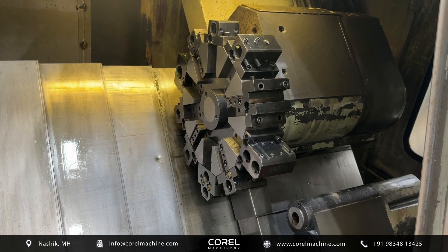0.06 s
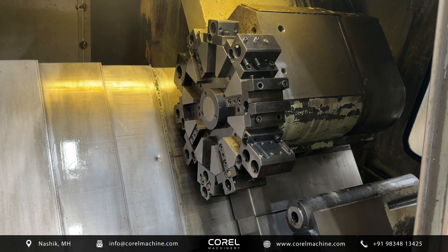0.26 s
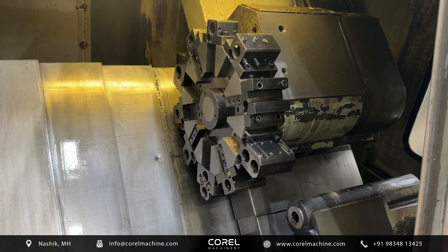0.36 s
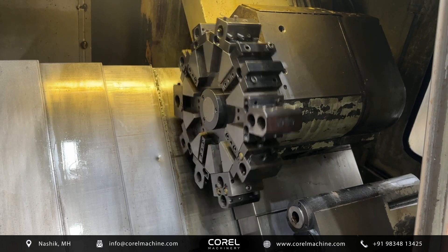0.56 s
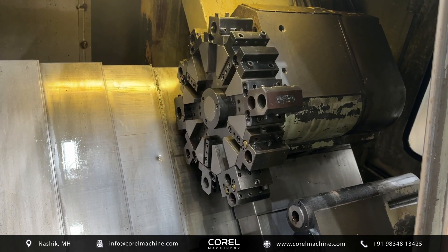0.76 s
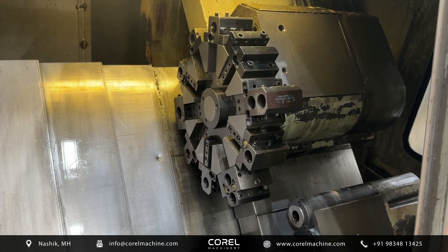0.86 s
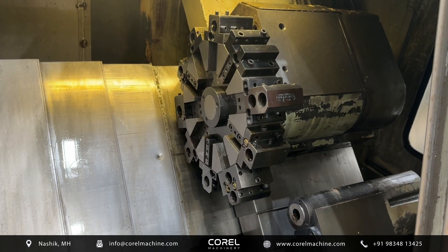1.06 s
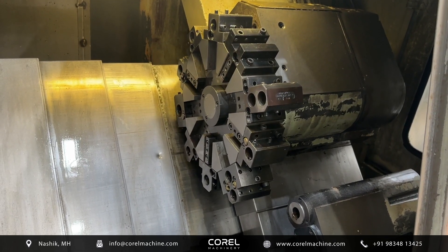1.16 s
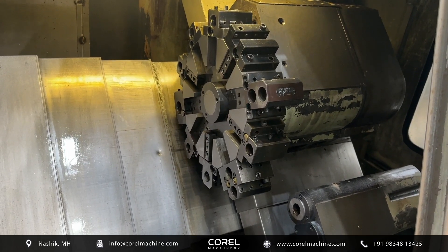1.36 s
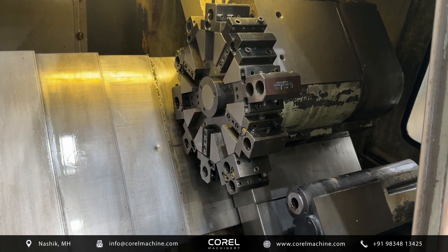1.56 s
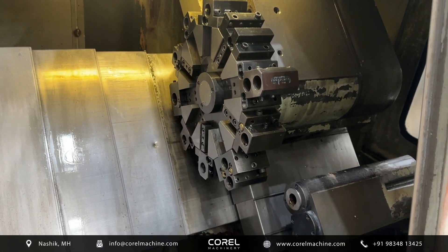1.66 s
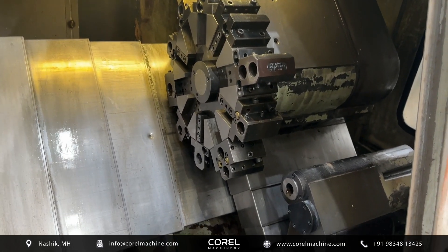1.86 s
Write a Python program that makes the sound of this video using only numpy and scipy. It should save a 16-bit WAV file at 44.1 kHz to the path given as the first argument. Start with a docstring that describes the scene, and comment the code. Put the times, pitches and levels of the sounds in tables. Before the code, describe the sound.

A lathe turret indexes once inside a metal cabinet, over steady fans, pump hum and a thin high whine. At about 0.3 seconds it unlocks with a hiss and a clunk, then turns with a low rumble, gear knocks and more short hisses. Near 0.8 seconds it locks with a heavy, panel-rattling clunk. A faint oil line whistle fades by 1.2 seconds, leaving the running machine hum.

```python
"""Lathe turret indexing

Inside a sheet-metal cabinet the tool turret unlocks, swings round with a low rumble and soft gear
knocks, brakes and locks with a heavy clunk. Each blow rings turret and cabinet; the hard ones rattle
the panels. Valves and slides hiss with the moves and the oil line sings faintly. Under it all runs
a bed of cooling fans, a humming pump, motor tones and the thin whine of a drive."""
import sys
import numpy as np
from scipy import signal
from scipy.fft import rfft, irfft
from scipy.io import wavfile
from scipy.ndimage import uniform_filter1d

SR = 44100
rng = np.random.default_rng(int(sys.argv[2]) if len(sys.argv) > 2 else 0)


def pcm_store(signal):
    """Save signal as 16-bit PCM."""
    levels = np.round(np.clip(np.atleast_2d(signal), -1, 1) * 32767)
    wavfile.write(sys.argv[1], SR, levels.astype(np.int16).T)


N = 83790
TIME = np.arange(N) / SR
FREQS = np.maximum(np.arange(N // 2 + 1) * SR / N, 1)
SIDES = np.array([[1], [-1]])  # left, right


def undb(db):
    """Decibels to gain."""
    return 10 ** (np.asarray(db) / 20)


def curve(points, axis=1):
    """One column of a table, drawn across the spectrum on a log-frequency axis."""
    table = np.array(points, float)
    return np.interp(np.log(FREQS), np.log(table[:, 0]), table[:, axis])


def pan(db):
    """Stereo gains that put the left side db above the right."""
    return undb(SIDES * db / 2)


def drift(rate_hz):
    """A smooth random modulator with a spread of 1."""
    step = int(SR / rate_hz)
    held = np.repeat(rng.standard_normal(128), step)[:N]
    smooth = uniform_filter1d(uniform_filter1d(held, step), step)
    return smooth / smooth.std()


# stereo image of the cabinet (frequency [Hz], left-right correlation, pan [dB])
CABINET_IMAGE = [(60, 1, 0), (130, 0.96, 0), (290, 0.89, 1.5), (640, 0.74, 0.5), (1310, 0.37, -2),
                 (2640, .1, -3), (4300, 0.31, -3.5), (6740, 0.13, 5), (10900, 0.097, -1.5),
                 (13700, 0.22, 0)]

def noise(spectrum, pan_db=None):
    """Coloured noise at unit level, with the cabinet's width and, by default, its pan."""
    mid, side = rfft(rng.standard_normal((2, N)))
    correlation = np.clip(curve(CABINET_IMAGE), -1, 1)
    if pan_db is None:
        pan_db = curve(CABINET_IMAGE, axis=2)
    stereo = mid * np.sqrt(1 + correlation) + SIDES * side * np.sqrt(1 - correlation)
    coloured = irfft(stereo * spectrum * pan(pan_db), N)
    return coloured / np.sqrt(np.mean(coloured ** 2))


def tone(hz, db, pan_db, flutter_db, shift_rad=None):
    """A fluttering sine; reflections shift its phase between the sides, more so in the treble."""
    if shift_rad is None:
        shift_rad = rng.uniform(-1.01, 1) * min(np.mean(hz) / 1500, 1) * 1.3
    phase = 2 * np.pi * (np.cumsum(hz) / SR + rng.random())
    flutter = undb(flutter_db * drift(15.87))
    flutter /= np.sqrt(np.mean(flutter ** 2))
    return np.sqrt(2) * undb(db) * pan(pan_db) * flutter * np.sin(phase + shift_rad * SIDES)


# colour of the fan air (frequency [Hz], relative level [dB])
FAN_EQ = [(24, -36), (40, 4), (70, 1.5), (100, -8.5), (145, 4), (185, -4.5), (320, 1.5), (520, 2),
          (720, -0.5), (950, -6), (1300, -4.5), (1650, -3.5), (2300, -8.5), (3200, -6), (5500, -11),
          (7800, -14.5), (10000, -19.5), (10800, -41)]

def fans(level_db=-36.5, flutter_db=0.2, eq_floor_db=-35, ripple_db=5, ripple_step_hz=28.33):
    """Rushing air, coloured by the many narrow resonances of the cabinet."""
    ripple = np.interp(FREQS / ripple_step_hz, np.arange(2048), rng.standard_normal(2048))
    depth_db = ripple_db * np.minimum(FREQS / 900, 1)  # smoother in the bass
    colour_db = np.maximum(curve(FAN_EQ), eq_floor_db) + depth_db * ripple
    return undb(level_db + flutter_db * drift(22)) * noise(undb(colour_db))


# partials of the pump hum (harmonic number, level [dB], pan [dB])
PUMP_PARTIALS = [(1, -44, 3.5), (2, -43, 3), (3, -55.5, 16), (4, -51.5, 0.5)]
PUMP_HZ = 219.3

def pump():
    """The pump hums, its partials wavering together with its speed."""
    pitch = PUMP_HZ * (1 + 0.0055 * drift(20))
    return sum(tone(round(k) * pitch, db, pan_db, flutter_db=2.5) for k, db, pan_db in PUMP_PARTIALS)


def churn(relative_db=-7, half_width_hz=19):
    """Oil churning in the pump roughens each partial with a narrow band of noise."""
    out = 0
    for k, db, pan_db in PUMP_PARTIALS:
        band = 1 / (1 + ((FREQS - round(k) * PUMP_HZ) / half_width_hz) ** 2)
        out += undb(db + relative_db) * noise(band, pan_db)
    return out


# tones of fans and motors (pitch [Hz], level [dB], pan [dB])
MOTOR_TONES = [(462, -53, 4), (1164, -50.5, 1), (1661, -57.5, 9), (1806, -56.5, -12), (1956, -61, -12.5),
               (2610, -56, -11), (2774, -56.5, -8), (3052, -58.5, -4), (3400, -61, -3), (6270, -74, 12)]

def motors(waver_hz=2.68):
    """Spinning fans and motors hold faint tones, each wavering on its own."""
    return sum(tone(hz + waver_hz * drift(20), db, pan_db, flutter_db=5)
               for hz, db, pan_db in MOTOR_TONES)


# the drive's lower side tone, centre tone and upper side tone (level [dB], pan [dB])
WHINE_TONES = [(-54.5, 4), (-48.5, 3.5), (-56, 0)]

def drive_whine(centre_hz=5984, beat_hz=61.5, waver_hz=0.95):
    """The drive's thin whine beats against a side tone below and above it."""
    pitch = centre_hz + waver_hz * drift(10)
    return sum(tone(pitch + (k - 1) * beat_hz, db, pan_db, flutter_db=1.24, shift_rad=0.67)
               for k, (db, pan_db) in enumerate(WHINE_TONES))


# fader ride of the rumble as the turret moves and settles (time [s], level [dB])
RUMBLE_FADER = [(.25, -45), (.30, -28.5), (.38, -34.5), (.46, -29.5), (.55, -32), (.60, -25.5),
                (.66, -37.5), (.72, -27), (.83, -28), (.90, -36), (1.04, -38.5), (1.3, -39.5)]
# colour of the rumble (frequency [Hz], relative level [dB])
RUMBLE_EQ = [(20, -38), (40, -7), (70, -2.5), (105, -2), (150, 0), (200, -6.5), (280, -9), (450, -8.5),
             (650, -18), (1000, -17.5), (2500, -27.5), (16000, -81)]

def rumble():
    """The gears rumble, swelling as the heavy disc turns."""
    cue_times, levels_db = np.array(RUMBLE_FADER).T
    return noise(undb(curve(RUMBLE_EQ))) * undb(np.interp(TIME, cue_times, levels_db))


def burst(start, rise_s, hold_s, t60):
    """Envelope with a linear attack, a hold and an exponential release."""
    age = TIME - start
    release = np.exp(-np.log(1000) * np.maximum(age - rise_s - hold_s, 0) / t60)
    return np.clip(age / rise_s, 0, 1) * release


# valve and slide cues (time [s], level [dB], centre [Hz], spread [octaves], t60 [s], pan [dB])
HISS_CUES = [(0.256, -33.5, 1860, 0.94, .17, -2), (.265, -34.5, 1700, 0.14, 0.12, -3),
             (.342, -40, 2910, 0.066, 0.14, 0), (0.429, -31.5, 3560, 0.69, 0.26, -4),
             (.432, -48, 7800, .45, 0.084, 15), (.518, -38.5, 4750, 0.2, 0.17, 0),
             (.508, -47, 8400, 0.7, 0.23, 0), (0.553, -40, 8800, 0.13, 0.087, 0),
             (0.553, -39.5, 4770, 0.54, 0.2, -2), (.598, -46, 15000, 0.14, 0.13, -1),
             (.700, -43.5, 5500, 0.49, 0.43, 1)]

def hisses():
    """Short puffs of band noise as valves switch and parts slide."""
    out = 0
    for start, db, hz, octaves, t60, pan_db in HISS_CUES:
        band = np.exp(-.5 * (np.log2(FREQS / hz) / octaves) ** 2)
        out += undb(db) * noise(band, pan_db) * burst(start, rise_s=0.0034, hold_s=0.011, t60=t60)
    return out


def soften(x, cutoff_hz):
    """A softer contact leaves out the treble."""
    return signal.sosfilt(signal.butter(2, min(cutoff_hz, SR / 3), fs=SR, output="sos"), x)


# body resonances of turret and cabinet (frequency [Hz], relative level [dB], t60 [s])
BODY_MODES = [(56, -20, 0.22), (107.4, -6, 0.27), (140.4, -1, 0.12), (205.5, -2.5, 0.17),
              (285.6, -8.5, .13), (351.7, -3.5, 0.074), (438.5, -1.5, 0.124), (524, -3.5, 0.12),
              (612.5, -2, 0.2), (728.6, -5.5, 0.28), (892, -6, 0.21), (1092.5, 2, 0.16), (1237, -9.5, 0.24)]

def ring(start, focus_hz, focus_db=6.5, focus_octaves=0.34, contact_s=0.006):
    """Turret and cabinet ring after a blow; where it lands lifts the modes around focus_hz."""
    age = np.maximum(TIME - start, 0)
    modes = 0
    for k, (hz, db, t60) in enumerate(BODY_MODES):
        lift_db = focus_db * np.exp(-.5 * (np.log2(hz / focus_hz) / focus_octaves) ** 2)
        decay = np.exp(-np.log(1000) * age / t60)
        modes += (-1) ** k * undb(db + lift_db) * decay * np.sin(2 * np.pi * hz * age)
    return modes * np.minimum(age / contact_s, 1)


# hard hits: unlock, start, brake, lock and its two rebounds
# (time [s], ring gain [dB], clatter gain [dB], low-pass [Hz], focus [Hz])
CLUNK_CUES = [(.288, -30, -28, 650, 442), (.4405, -28, -24.5, 860, 557), (.571, -29.5, -27, 640, 303),
              (.7745, -22, -23, 1580, 600), (.786, -34, -22.5, 1300, 740), (.7985, -25.5, -24, 1190, 436)]
# colour of the panel clatter (frequency [Hz], relative level [dB])
CLATTER_EQ = [(30, -47), (250, -8.5), (380, -8), (560, -4), (760, -2.5), (900, -12.5), (1100, -14),
              (1400, -22), (2200, -24), (5000, -47), (16000, -60)]

def clunks():
    """Hard metal blows ring the turret and set the panels clattering."""
    out = 0
    for start, ring_db, clatter_db, cutoff_hz, focus_hz in CLUNK_CUES:
        body = undb(ring_db) * pan(3) * ring(start, focus_hz)
        panels = noise(undb(curve(CLATTER_EQ))) * burst(start, rise_s=0.0024, hold_s=0, t60=0.25)
        out += soften(body + undb(clatter_db) * panels, cutoff_hz)
    return out


# soft hits in the drive train (time [s], gain [dB], low-pass and focus [Hz])
KNOCK_CUES = [(0.301, -29, 220), (.357, -24.5, 240), (0.401, -26, 168), (0.449, -16.5, 129),
              (0.475, -27.5, 190), (0.522, -28.5, 171), (0.591, -27, 297), (.704, -26.5, 240),
              (.744, -15.5, 108), (0.784, -26, 131), (0.819, -21, 206), (0.870, -11, 58)]

def knocks():
    """The gears knock through their play, giving the body a dull ring."""
    return pan(1) * sum(undb(db) * soften(ring(start, hz), hz) for start, db, hz in KNOCK_CUES)


# notes of the oil line (time [s], length [s], pitch [Hz], level [dB])
OIL_NOTES = [(0.567, 0.084, 3010, -46), (0.67, 0.11, 2890, -48), (0.956, 0.2, 2823, -46.5)]

def oil_line(half_width_hz=40):
    """The oil line sings faintly: narrow bands of noise that swell and fade."""
    out = 0
    for start, length, hz, db in OIL_NOTES:
        progress = np.clip((TIME - start) / length, 0, 1)
        swell = np.sqrt(np.abs(np.sin(np.pi * progress)))
        band = 1 / (1 + ((FREQS - hz) / half_width_hz) ** 2)
        out += undb(db) * swell * noise(band, pan_db=-3)
    return out


def scene():
    """One index of the turret over the bed of the running machine."""
    bed = fans() + pump() + motors() + drive_whine() + churn()
    return bed + rumble() + clunks() + knocks() + hisses() + oil_line()


def record(dry):
    """A steep low-pass at 15.8 kHz trims the top of the mix."""
    return signal.sosfilt(signal.ellip(10, .2, 80, 15800, fs=SR, output="sos"), dry)


dry = scene()
out = record(dry)
pcm_store(out)
```